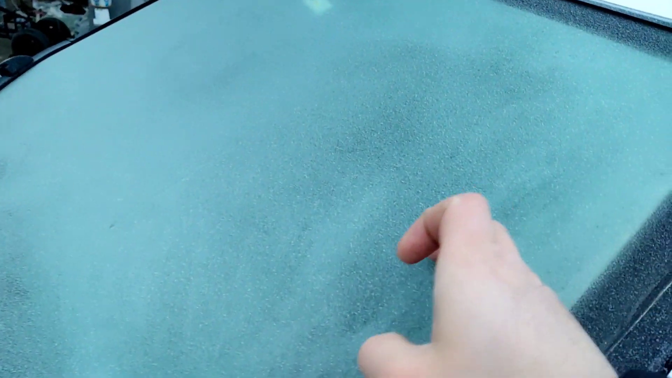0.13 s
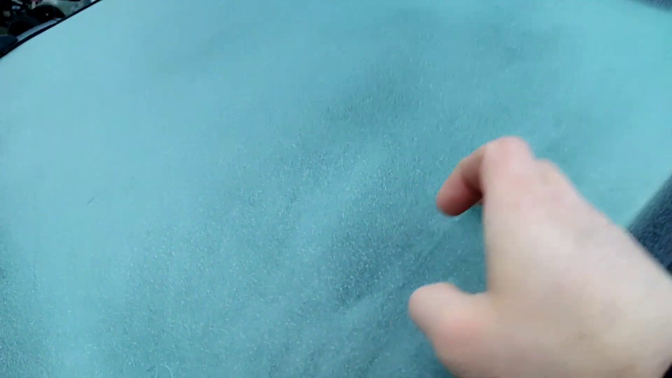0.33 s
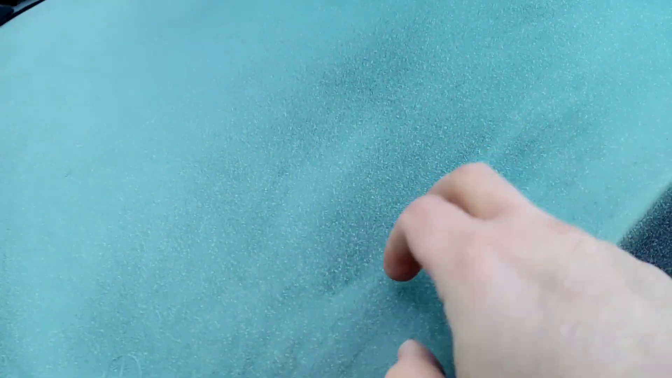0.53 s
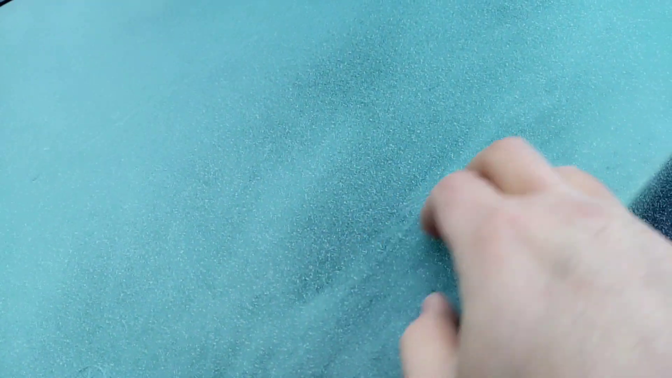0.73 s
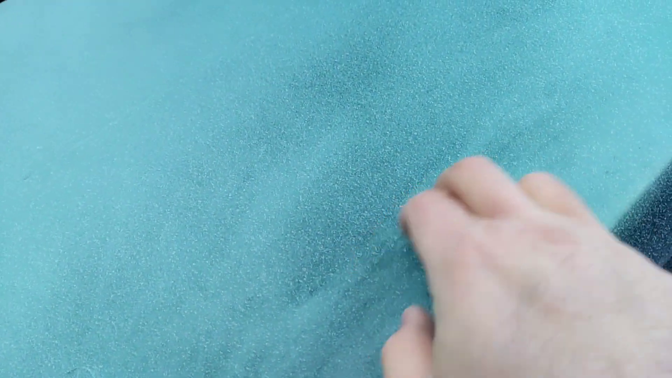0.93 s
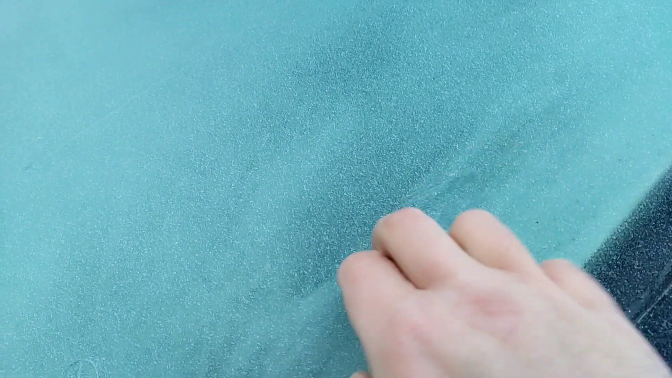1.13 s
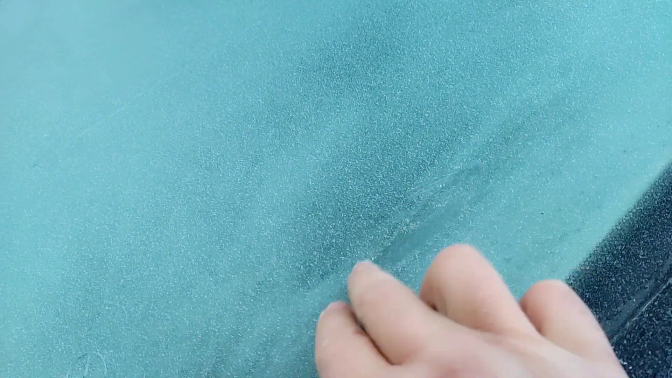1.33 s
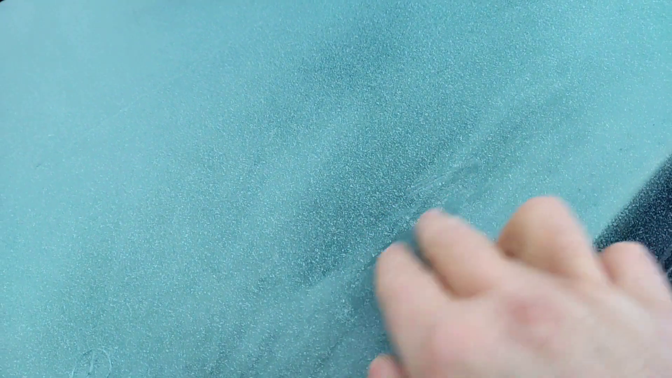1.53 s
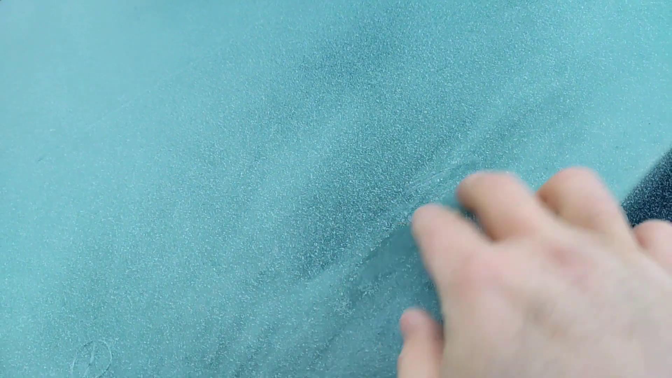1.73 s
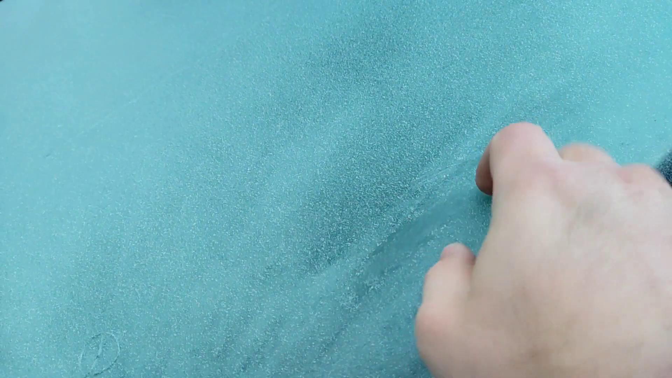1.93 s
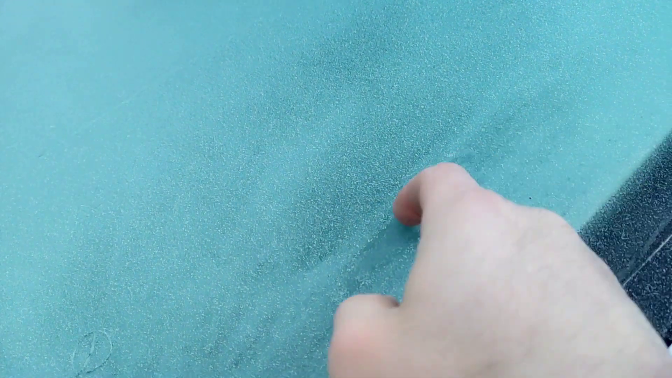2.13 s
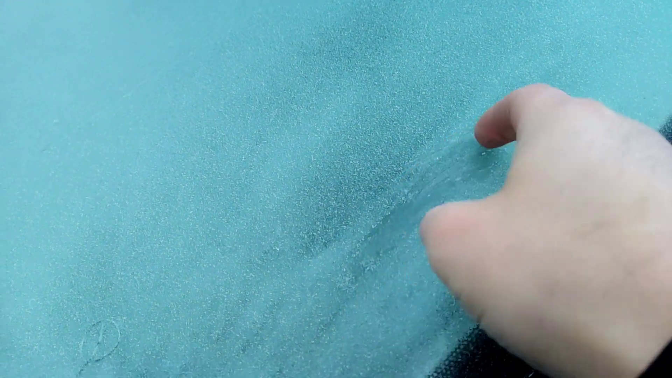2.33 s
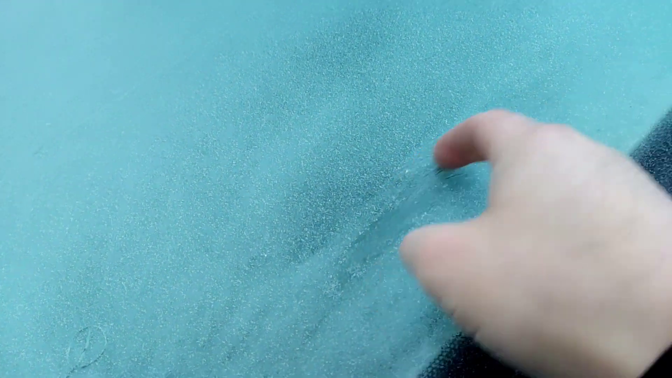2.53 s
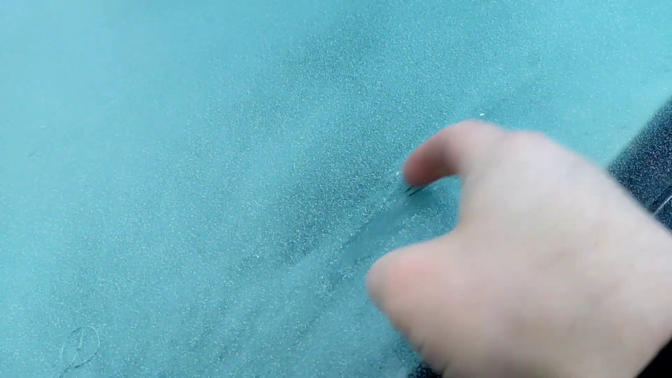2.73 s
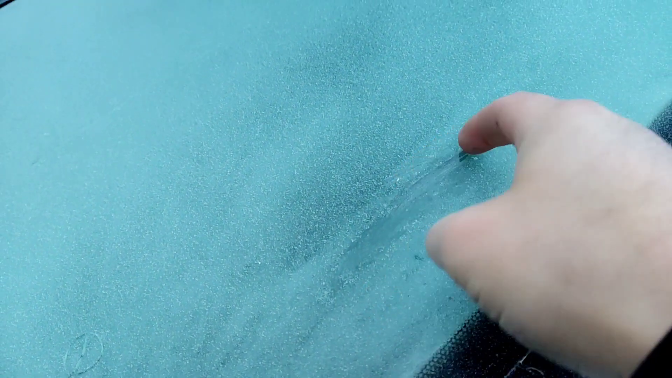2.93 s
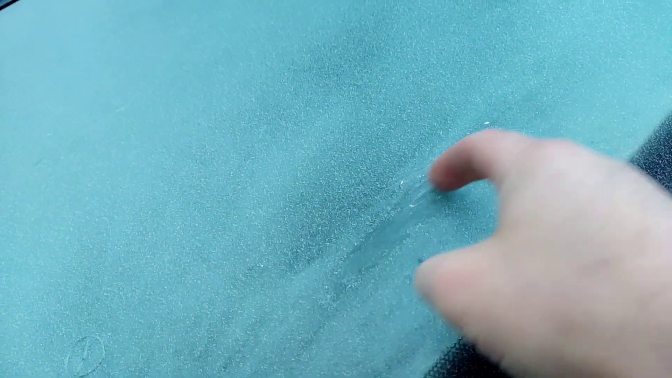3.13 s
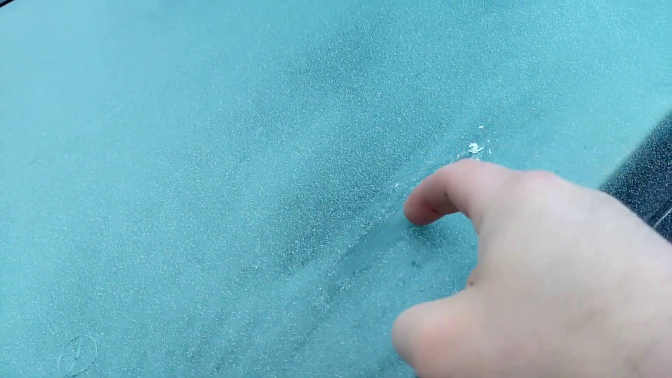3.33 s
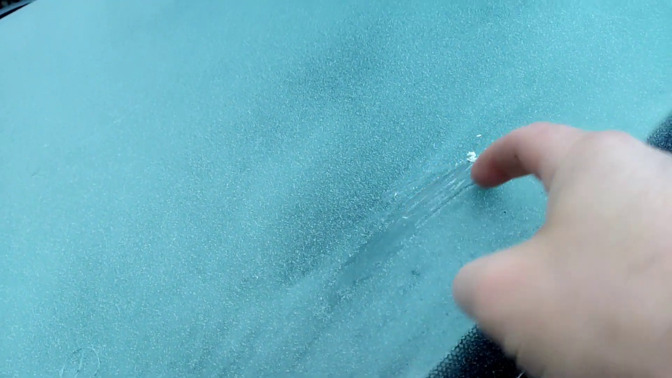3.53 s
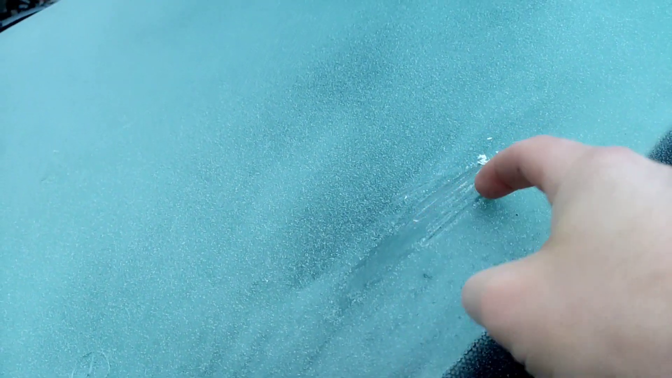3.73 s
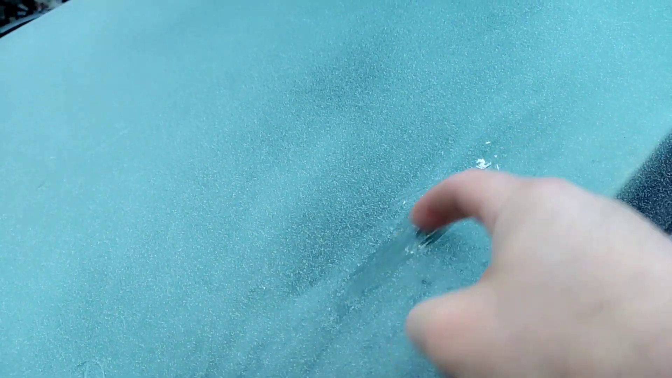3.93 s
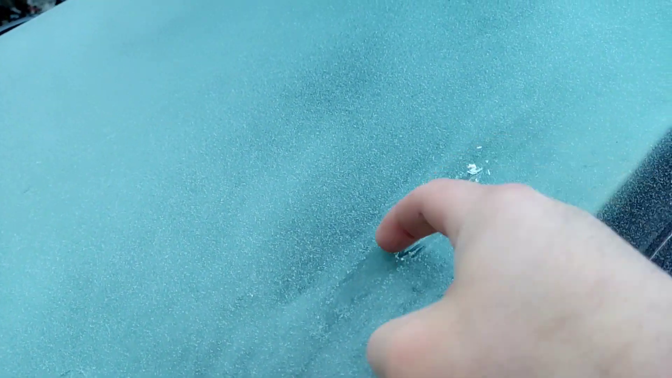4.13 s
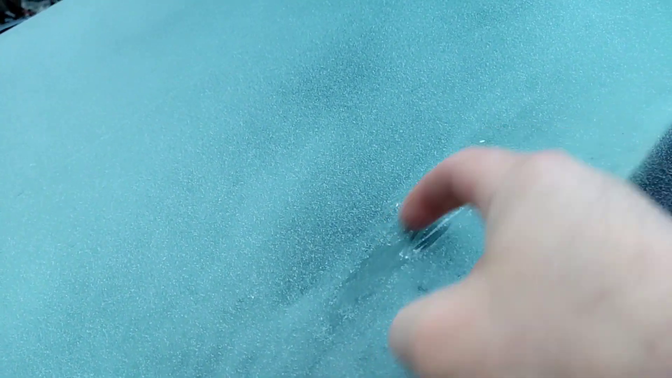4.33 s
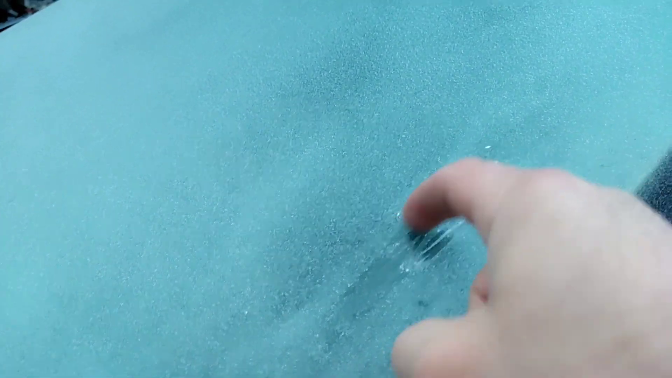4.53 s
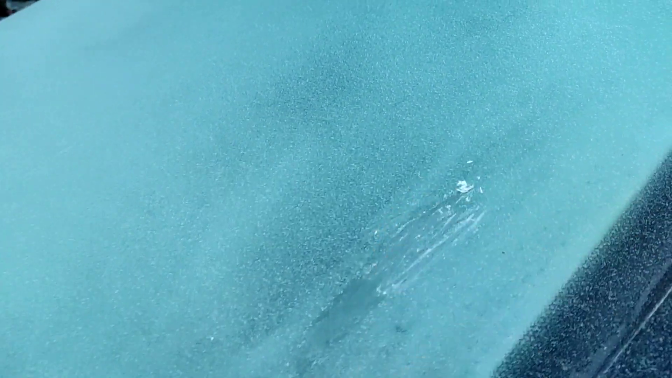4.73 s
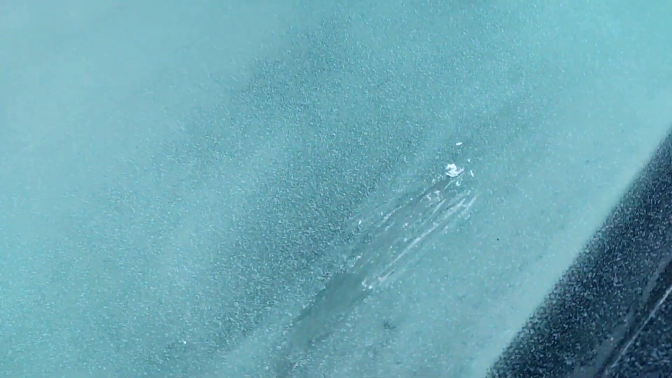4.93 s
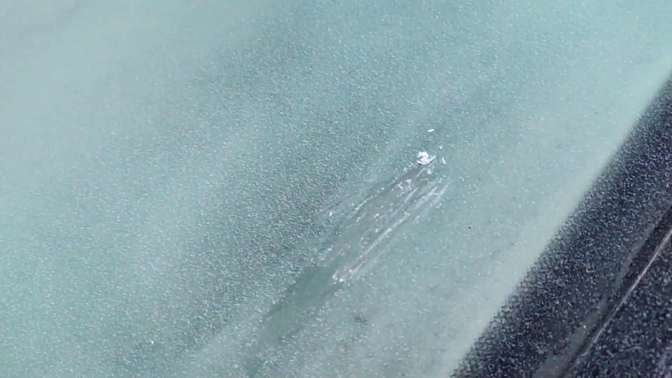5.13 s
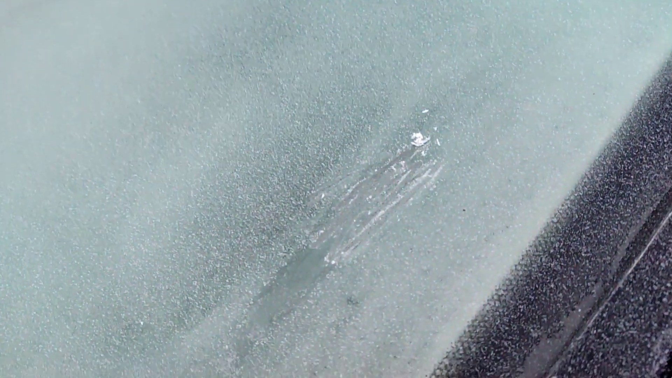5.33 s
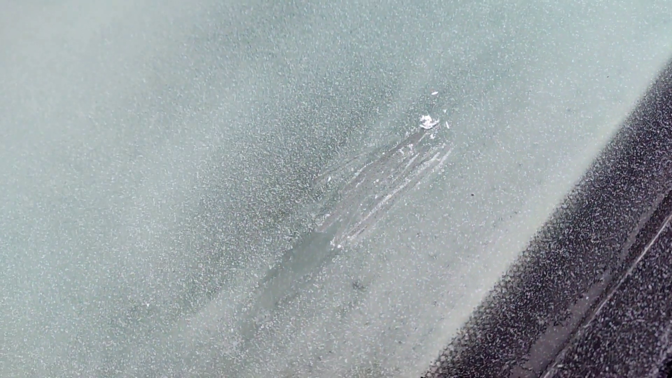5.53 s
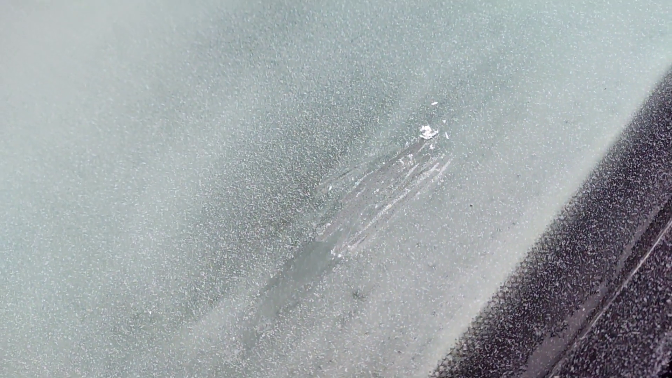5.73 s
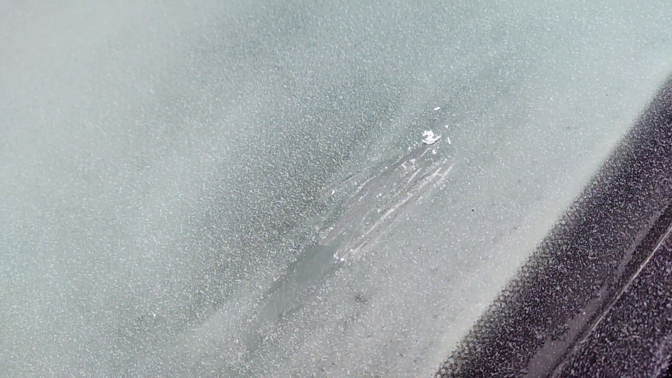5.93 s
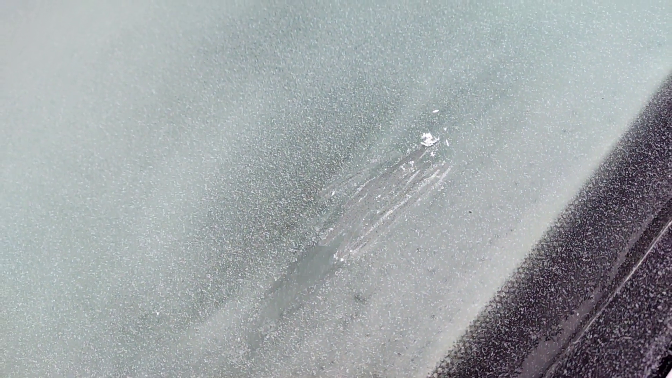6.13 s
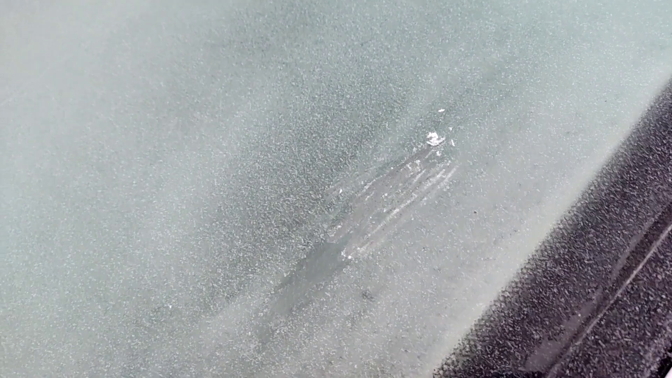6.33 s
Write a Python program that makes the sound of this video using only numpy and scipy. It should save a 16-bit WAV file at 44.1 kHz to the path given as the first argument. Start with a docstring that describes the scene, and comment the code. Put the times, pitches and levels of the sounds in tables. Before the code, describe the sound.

Close to a hand-held stereo microphone outdoors, a sleeve swishes and a shoe scuffs grit, then a fingernail scratches windshield frost in quick, crisp strokes. After a short pause a longer run of scratches follows, with a tiny squeak on bare glass. Low distant rumble ebbs beneath wind puffs; soft thuds and sleeve rustle end it.

```python
"""Frost is scratched off a car windshield, close to a hand-held camera outdoors, in about six seconds.
From the start a low distant rumble ebbs under light wind, gusts and eddies made of shaped noise and pulses.
A sleeve of tiny random snaps swishes, a wavering tone chirps on bare glass, and a shoe scuffs grit.
Then a fingernail scratches in quick strokes: bright crystal snaps over the duller ringing of the glass.
Near the end the hand bumps the camera with dull thuds of noise, and the sleeve swishes back."""
import sys
import numpy as np
from scipy import signal
from scipy.fft import rfft, irfft, next_fast_len
from scipy.io import wavfile
from scipy.ndimage import uniform_filter1d, map_coordinates

SR = 44100
rng = np.random.default_rng(int(sys.argv[2]) if len(sys.argv) > 2 else 0)


def log_audio(samples):
    """Write samples as a 16-bit WAV file to the path given in sys.argv[1]."""
    # one column per channel
    frames = np.atleast_2d(samples).T
    # limit to full scale, then quantise
    limited = np.clip(frames, -1, 1)
    pcm = np.round(limited * 32767).astype(np.int16)
    wavfile.write(sys.argv[1], SR, pcm)


N = 285768
TIME = np.arange(N) / SR  # seconds

# Colour of the rubbed glass, also used for rubbing skin: pitch_hz [Hz], level_db [dB]
PANE_COLOUR = [(150, 0.5), (300, 0.5), (700, -0.5), (1100, 1), (2000, -3), (2800, -12.5), (3500, -5),
               (6000, -22.5)]


def amp(db):
    """Turn decibels into a plain gain."""
    return 10 ** (np.asarray(db) / 20)


def unit(pair):
    """Scale a stereo pair so that the average of left and right has rms 1."""
    middle = pair.mean(axis=0)
    return pair / np.sqrt(np.mean(middle ** 2) + 1e-20)


def along(points, hz):
    """Read a curve of (Hz, value) points, joined by straight lines on a log frequency axis."""
    f, v = np.transpose(points)
    return np.interp(np.log(hz + 1), np.log(f + 1), v)


def wobble(rate):
    """Draw a smooth random curve through `rate` random points a second."""
    knots = rng.standard_normal(int(N * rate / SR) + 4)
    return map_coordinates(knots, [TIME * rate])


def filtered(x, response):
    """Multiply the spectrum of x by a response that depends on frequency."""
    m = next_fast_len(N + SR // 2)  # spare room so that ringing does not wrap around
    hz = np.fft.rfftfreq(m, 1 / SR)
    return irfft(rfft(x, m) * response(hz), m)[..., :N]


def panned(lead_db):
    """Give left and right gains of constant power; a positive lead favours the left."""
    lead = np.atleast_1d(lead_db)
    gains = amp(np.array([lead, -lead]) / 2)
    return gains / np.sqrt(np.mean(gains ** 2, axis=0))


def noise():
    """Make two unrelated streams of white noise."""
    return rng.standard_normal((2, N))


def grains(rate, spread_db):
    """Make two streams of tiny snaps of uneven size, about `rate` a second."""
    happens = rng.random((2, N)) < rate / SR
    return happens * np.sign(noise()) * amp(spread_db * noise())


def patchy(pair, depth_db):
    """Let the colour drift as the contact moves over new spots."""
    z = signal.stft(pair, nperseg=512)[2]
    field = rng.standard_normal(z.shape)
    field = uniform_filter1d(field, size=7, axis=1)  # smooth over pitch
    field = uniform_filter1d(field, size=7, axis=2)  # smooth over time
    gain = amp(depth_db * field / field.std())
    return signal.istft(z * gain, nperseg=512)[1][:, :N]


def heard(pair, spectrum, alike=None):
    """Colour two streams, blend them where the ports hear alike, and ring each port's cavity."""
    # How alike left and right are: pitch_hz [Hz], likeness [1 = the same, 0 = unrelated]
    usual_likeness = [(30, 1), (250, 0.81), (700, 0.33), (2000, 0.0032), (5000, 0), (14000, 0)]
    # Cavities of the left and right microphone ports: pitch_hz [Hz], width_hz [Hz]
    port_cavities = [(9960, 2030), (7914, 1250)]
    likeness = usual_likeness if alike is None else alike

    def blend(hz):
        turn = np.arccos(np.clip(along(likeness, hz), -1, 1)) / 2
        return amp(along(spectrum, hz)) * [np.cos(turn), np.sin(turn)]

    def cavity(hz):
        return np.array([c * c / (c * c - hz * hz + 1j * hz * width) for c, width in port_cavities])

    mid, side = filtered(pair, blend)
    return unit(filtered(np.array([mid + side, mid - side]), cavity))


def burst(start, rise, hold, t60):
    """Shape a quick rise, a hold and a fade that loses 60 dB in t60 seconds."""
    age = TIME - start
    fade_age = np.maximum(age - rise - hold, 0)
    return np.clip(age / rise, 0, 1) * amp(-60 * fade_age / t60)


def stroke(start, fastest, end, landing):
    """Samples, progress (0-1) and speed (0-1) of a movement that lands under way, speeds up and stops."""
    span = slice(int(start * SR), int(end * SR))
    progress = np.interp(TIME[span], [start, fastest, end], [landing, .5, 1])
    return span, progress, np.abs(np.sin(np.pi * progress))


def outdoors(hums_db=-3, lead_db=-0.5):
    """Distant rumble of coloured noise slowly ebbs, with steady fuzzy hums of narrow noise bands."""
    # Colour of the outdoor background: pitch_hz [Hz], level_db [dB]
    air_colour = [(20, 22), (60, 11), (150, 3.5), (220, 3), (295, 5.5), (380, 0.5), (700, 1), (1300, -3.5),
                  (2500, -6), (5000, -9), (8000, -13), (14000, -8)]
    # Distant machinery: pitch_hz [Hz], width_hz [Hz], level_db [dB, before hums_db]
    hum_bands = [(154.2, 11.5, -63.5), (296.4, 13.6, -65), (476, 7.6, -74), (935, 14, -79.5),
                 (1600, 19, -75.5), (1934, 25, -80.5)]
    settled_db, ebb_db, ebb_s = -56.5, 6.5, 1.42  # starts ebb_db higher; ebb_s is the time constant

    def bands(hz):
        total = 0
        for c, width, db in hum_bands:
            even_level = np.sqrt(SR / (np.pi * width))  # makes up for a narrow band passing little noise
            total = total + amp(db) * even_level / (1 + 2j * (hz - c) / width)
        return total

    hums = filtered(noise()[0], bands)
    rumble = amp(settled_db + ebb_db * np.exp(-TIME / ebb_s)) * heard(noise(), air_colour)
    return panned(lead_db) * (rumble + amp(hums_db) * hums)


def wind(buffet_db=-2, lump_db=2.5, linger=1.15):
    """Gusts swell over a light breeze and die a little more slowly; a passing eddy sucks, then pushes."""
    # Colour of wind on the ports: pitch_hz [Hz], level_db [dB]
    buffet_colour = [(12, -6.5), (30, 2.5), (55, -1.5), (90, -7), (150, -14.5), (230, -21.5), (400, -59),
                     (1000, -81)]
    # Gusts: strongest_s [s], half_length_s [s], level_db [dB, before buffet_db], left_lead_db [dB]
    gust_list = [(0.3, 0.25, -49, -6), (0.564, 0.06, -39, -24), (0.79, 0.13, -46.5, 10),
                 (0.984, 0.032, -42, -2), (1.33, 0.14, -51.5, -12), (1.813, 0.044, -30.5, -27),
                 (2.123, 0.081, -40, -27), (2.69, 0.064, -36, -18), (3.04, 0.12, -41.5, -13),
                 (3.313, 0.049, -43, -22), (3.724, 0.24, -43.5, -6), (3.986, 0.084, -40, -17),
                 (4.27, 0.038, -39, -8), (4.546, 0.16, -42, -17), (4.86, 0.072, -46.5, -7),
                 (5.17, 0.053, -48.5, -12), (5.717, 0.055, -52.5, -14)]
    # Single eddies hitting a port: middle_s [s], width_s [s], strength_db [dB], left_lead_db [dB]
    eddy_list = [(0.636, 0.0017, -30, -28), (.693, 0.0049, -30, 22), (1.854, 0.0017, -26.5, -23),
                 (2.66, 0.0029, -21.5, -29), (2.691, 0.0013, -28, -29), (2.723, 0.0021, -24.5, -24),
                 (2.987, 0.0015, -29.5, -24), (4.062, 0.0025, -20, -27), (4.589, 0.0023, -24, -37),
                 (4.69, 0.0027, -28.5, -20), (4.818, 0.0023, -28, -29)]
    breeze_db, breeze_lead_db = -56.5, -3.5  # before buffet_db; stronger on the right port
    power = (amp(breeze_db) * panned(breeze_lead_db)) ** 2 * np.ones(N)
    for centre, half, db, lead_db in gust_list:
        u = (TIME - centre) / half
        swell = np.exp(-np.where(u < 0, u, u / linger) ** 2)
        power += (amp(db) * panned(lead_db)) ** 2 * swell
    lumps = amp(lump_db * np.array([wobble(22), wobble(22)]))  # turbulence differs from port to port
    buffeting = unit(lumps * heard(noise(), buffet_colour, [(50, 0.047)]))
    out = amp(buffet_db) * np.sqrt(power) * buffeting
    for centre, width, strength_db, lead_db in eddy_list:
        u = (TIME - centre) / width
        out += amp(strength_db) * panned(lead_db) * u * np.exp(-u * u / 2)
    return out


def sleeve(landing=0.17, growth=1.06, attack_s=0.023):
    """Fine nylon threads slide over each other in a smooth high hiss that grows with the arm's speed."""
    # Arm movements: start_s [s], fastest_s [s], end_s [s], level_db [dB], left_lead_db [dB]
    arm_moves = [(0.023, 0.182, 0.22, -45.5, -2), (0.295, 0.32, 0.5, -48, -1),
                 (0.475, 0.547, 0.59, -50, -5), (0.628, 0.673, 0.75, -52.5, -3),
                 (1.697, 1.79, 2.046, -44.5, 0.5), (4.572, 4.784, 5.23, -44.5, -0.5),
                 (4.96, 5.19, 5.406, -46, 0.5), (5.767, 5.838, 6.2, -59.5, -5), (5.892, 6.08, 6.57, -47, 4)]
    # Colour of the nylon: pitch_hz [Hz], level_db [dB]
    nylon_colour = [(200, -17), (700, 3.5), (2000, 1), (3000, -2.5), (5000, 1), (7000, 1.5), (9500, 5),
                    (12000, 4.5), (14000, 2)]
    sweep_db = 2.5  # left lead gained per unit of progress
    power = np.zeros((2, N))
    for start, fastest, end, db, lead_db in arm_moves:
        span, progress, speed = stroke(start, fastest, end, landing)
        contact = np.clip((TIME[span] - start) / attack_s, 0, 1)
        sides = panned(lead_db + sweep_db * (progress - .5))
        power[:, span] += (amp(db) * contact * speed ** growth * sides) ** 2
    threads = patchy(grains(rate=25000, spread_db=2), depth_db=1.3)
    return np.sqrt(power) * heard(threads, nylon_colour)


def squeaks(waver=0.032):
    """On bare glass the nail sticks and slips, chirping briefly at an unsteady pitch."""
    # Chirps: start_s [s], length_s [s], pitch_hz [Hz, average], level_db [dB, peak]
    chirps = [(0.269, 0.0088, 1600, -52.5), (2.403, 0.016, 1580, -45), (2.464, 0.046, 1975, -53)]
    out = np.zeros(N)
    for start, length, hz, db in chirps:
        swell = np.sin(np.pi * np.clip((TIME - start) / length, 0, 1))
        pitch_hz = hz * (1 + waver * wobble(400))
        out += amp(db) * swell * np.sin(2 * np.pi * np.cumsum(pitch_hz) / SR)
    return out


def scuffs():
    """A sole drags over grit as the weight shifts, breaking into many small uneven snaps."""
    # Scuffs: start_s [s], rise_s [s], hold_s [s], t60_s [s], level_db [dB]
    shoe_drags = [(0.4, 0.024, 0.012, 0.52, -46), (0.769, 0.0028, 0.09, 0.4, -40.5),
                  (0.846, 0.0024, 0.0026, 0.025, -52)]
    # Colour of the grit: pitch_hz [Hz], level_db [dB]
    grit_colour = [(60, -19), (170, 11), (350, 3), (600, 4), (900, -1), (1200, 1.5), (1550, 7.5),
                   (2200, 3.5), (3200, -3), (4500, -5), (6500, -11.5), (9000, -10.5), (14000, -11.5)]
    drag = sum(amp(db) * burst(s, rise, hold, t60) for s, rise, hold, t60, db in shoe_drags)
    grit = patchy(grains(rate=7000, spread_db=2.5), depth_db=1.5)
    unevenness = amp(0.68 * wobble(119.7))
    return drag * unevenness * heard(grit, grit_colour, [(200, 0.73), (2000, 0.15), (6000, 0.13)])


def scratching(landing=0.12, roundness=1.73, saturation=1.02, body_growth=0.75):
    """The nail lands moving, speeds up and stops; it snaps frost crystals and rubs the pane beneath."""
    # Nail strokes: start_s [s], fastest_s [s], end_s [s], hiss_level_db [dB, before hiss_db],
    # pane_level_db [dB relative to the hiss column, before body_db]
    nail_strokes = [(0.93, 0.976, 1.035, -48.5, -12), (1.039, 1.104, 1.203, -45, -15),
                    (1.186, 1.252, 1.305, -44.5, -20), (1.296, 1.363, 1.424, -40, -18.5),
                    (1.431, 1.48, 1.568, -41, -21), (1.552, 1.591, 1.68, -44.5, -16.5),
                    (2.069, 2.124, 2.187, -41.5, -11.5), (2.21, 2.304, 2.401, -42, -13.5),
                    (2.397, 2.464, 2.535, -44.5, -9), (2.547, 2.612, 2.71, -41.5, -13.5),
                    (2.708, 2.773, 2.824, -48, -10), (2.855, 2.922, 2.99, -45, -14),
                    (3.006, 3.069, 3.13, -44, -12), (3.163, 3.2, 3.28, -42, -14.5),
                    (3.286, 3.354, 3.4, -43, -10), (3.43, 3.496, 3.535, -44.5, -14),
                    (3.55, 3.618, 3.687, -41.5, -11.5), (3.698, 3.739, 3.838, -44.5, -10),
                    (3.828, 3.903, 3.95, -47, -8.5), (3.956, 3.977, 4.125, -41.5, -16),
                    (4.135, 4.16, 4.21, -47.5, -16), (4.222, 4.229, 4.39, -49.5, -10),
                    (4.355, 4.39, 4.55, -51.5, -16.5), (4.501, 4.56, 4.606, -51.5, -11)]
    # Colour of breaking frost: pitch_hz [Hz], level_db [dB]
    crystal_colour = [(1500, -17), (3000, -7), (3800, -9.5), (4200, -2.5), (5000, -2), (5700, -2),
                      (7100, -6.5), (8500, -4.5), (10000, -1), (11000, -1.5), (12500, 2), (14200, -0.5)]
    # Right port's lead for sound off the glass: pitch_hz [Hz], right_lead_db [dB]
    glass_shade = [(1000, 2), (3400, 1.5), (4500, 4.5), (5800, 4.5), (7500, 1), (9500, 3.5), (11000, 6),
                   (12500, 13), (14000, 10.5)]
    # Bending modes of the windshield: pitch_hz [Hz], width_hz [Hz], lift_db [dB]
    pane_modes = [(910, 39, 5), (1500, 150, 4.5), (1892, 116, 7.5), (2260, 90, 10), (2513, 104, 13)]
    hiss_db, body_db, flake_db = -0.2, 2.1, -8  # trims of hiss and pane; flakes relative to powder
    nail_lead_db = -1.5  # left lead: the hand works a little to the right
    hiss, body = np.zeros(N), np.zeros(N)
    for start, fastest, end, db, pane_db in nail_strokes:
        span, _, speed = stroke(start, fastest, end, landing)
        # the rasp levels off once the nail ploughs through
        scrape = np.tanh(saturation * speed ** roundness) / np.tanh(saturation)
        hiss[span] += amp(db + hiss_db) * scrape
        # slow parts of a stroke are duller
        body[span] += amp(db + pane_db + body_db) * scrape ** body_growth

    def shade(hz):
        lead = along(glass_shade, hz)
        return amp(np.array([-lead, lead]) / 2)

    def modes(hz):
        return amp(sum(db / (1 + (2 * (hz - c) / width) ** 2) for c, width, db in pane_modes))

    powder = unit(grains(rate=18000, spread_db=3.0))
    flakes = unit(grains(rate=700, spread_db=-4))
    snaps = patchy(powder + amp(flake_db) * flakes, depth_db=1.3)
    frost = unit(filtered(heard(snaps, crystal_colour), shade))
    rubbing = filtered(grains(rate=5000, spread_db=3), modes)
    pane = unit(filtered(heard(rubbing, PANE_COLOUR), shade))
    catching = amp(0.7 * wobble(260) + 0.7 * wobble(60))  # the nail catches on thicker patches
    return catching * (hiss * panned(nail_lead_db) * frost + body * pane)


def bumps(rise=0.0017, hold=0.0045):
    """The hand softly bumps the camera: each bump is a dull thud with a little rub of skin."""
    # Bumps: start_s [s], level_db [dB], t60_s [s], rub_level_db [dB relative to the thud]
    hand_bumps = [(4.231, -43.5, 0.12, -12), (4.248, -47, 0.085, -10), (4.281, -47, 0.52, -14),
                  (4.42, -50.5, 0.074, -4.5), (4.554, -42, 0.13, -10.5), (4.691, -43, 0.017, -12),
                  (6.068, -42.5, 0.37, -32)]
    # Colour of the thud: pitch_hz [Hz], level_db [dB]
    thud_colour = [(30, -2), (70, -5.5), (150, -4), (260, -10.5), (460, -16.5), (750, -21.5), (1500, -39),
                   (4000, -69)]
    thud, rub = np.zeros(N), np.zeros(N)
    for s, db, t60, rub_db in hand_bumps:
        push = amp(db) * burst(s, rise, hold, t60)
        thud += push
        rub += amp(rub_db) * push
    return thud * heard(noise(), thud_colour, [(200, 0.75)]) + rub * heard(noise(), PANE_COLOUR)


def scene():
    """Distant rumble and wind all around, the hand, arm and shoe in front."""
    return outdoors() + wind() + sleeve() + squeaks() + scuffs() + scratching() + bumps()


def record(dry):
    """The camera keeps nothing above its band limit, reached over a 200 Hz slope."""
    top_hz = 14330  # middle of the slope
    return filtered(dry, lambda hz: np.clip((top_hz - hz) / 200 + .5, 0, 1))


dry = scene()
out = record(dry)
log_audio(out)
```